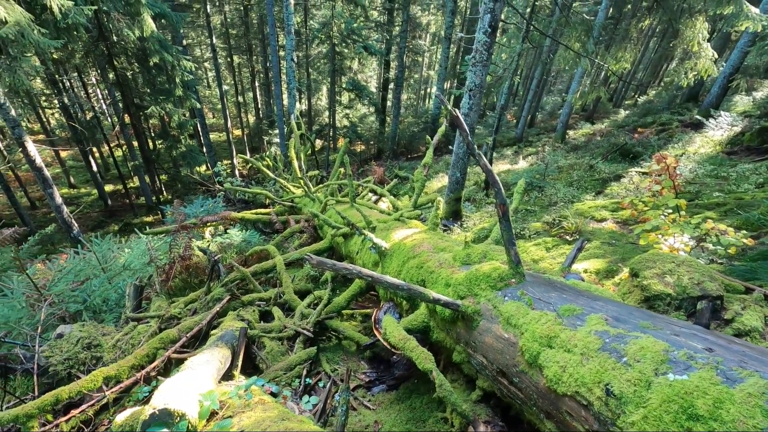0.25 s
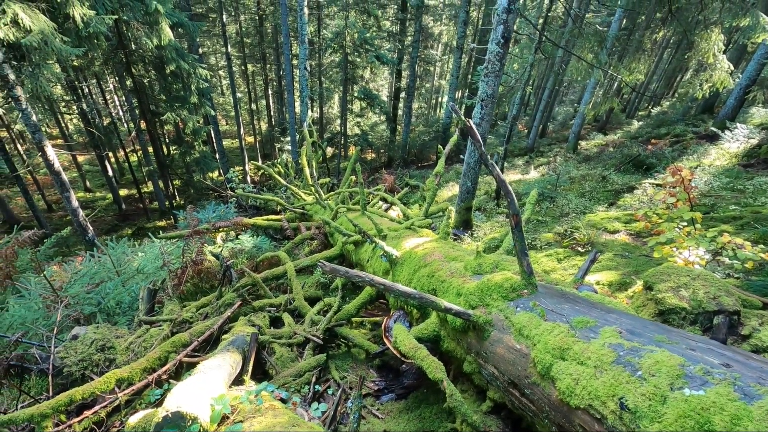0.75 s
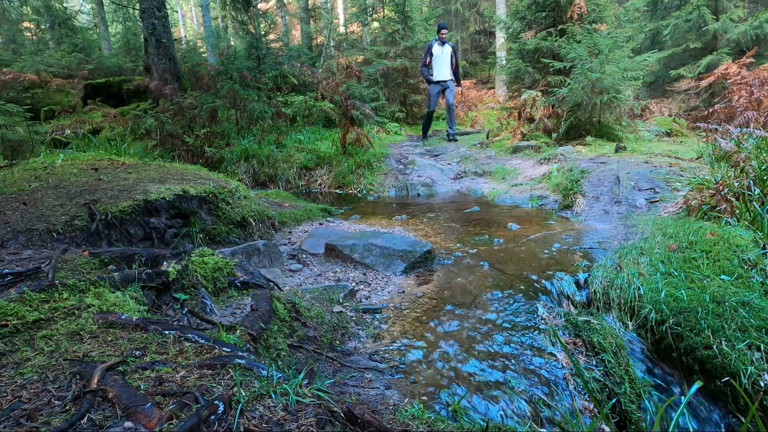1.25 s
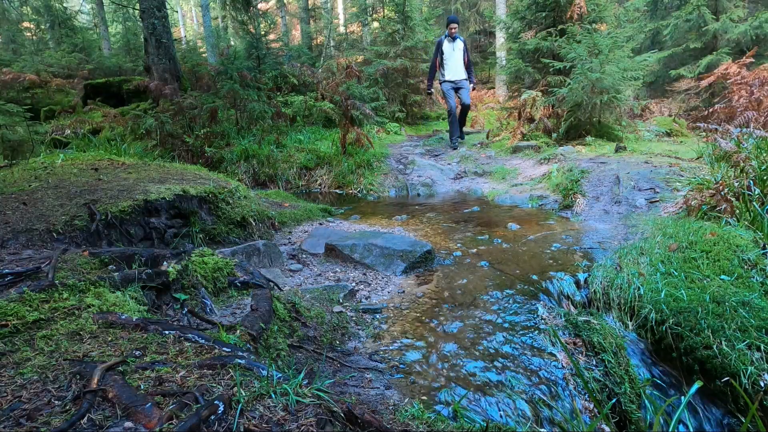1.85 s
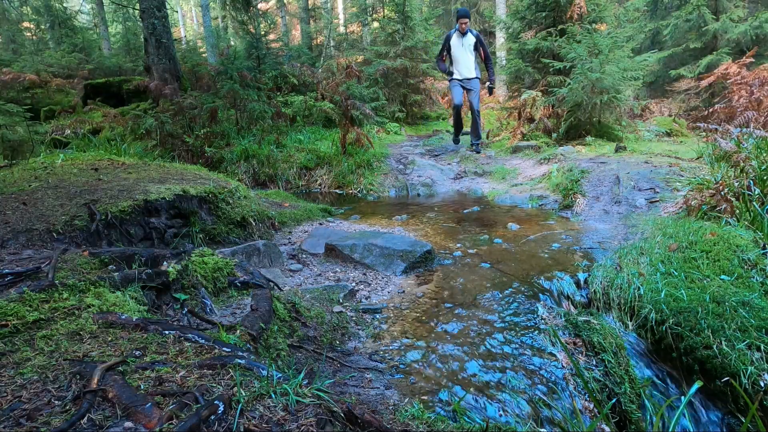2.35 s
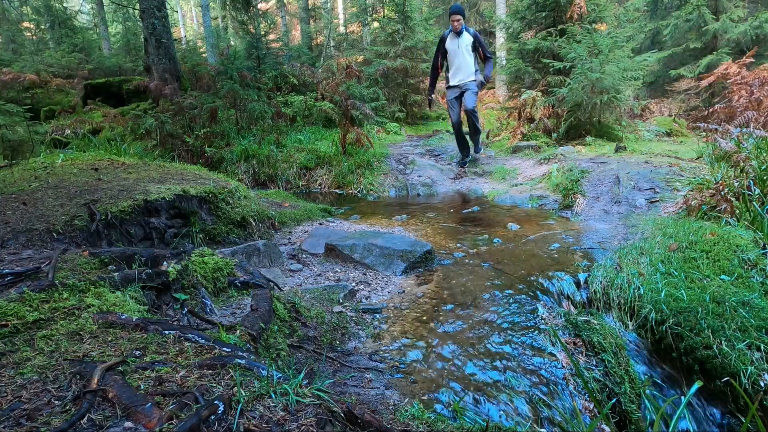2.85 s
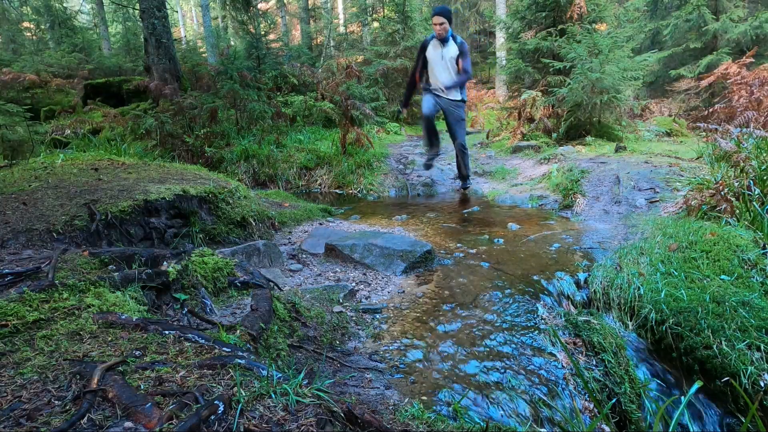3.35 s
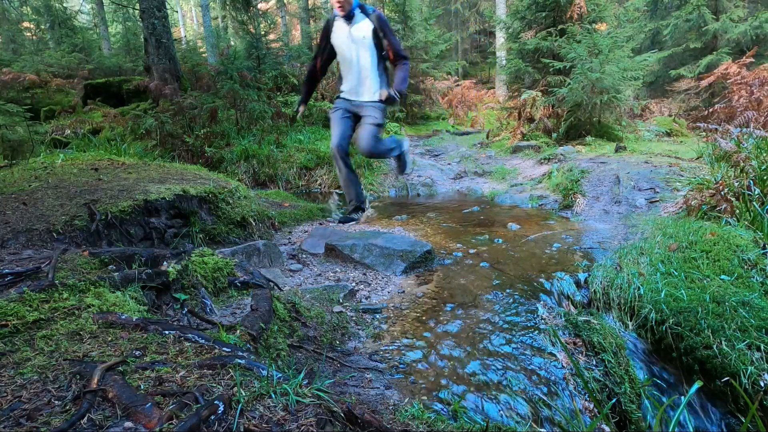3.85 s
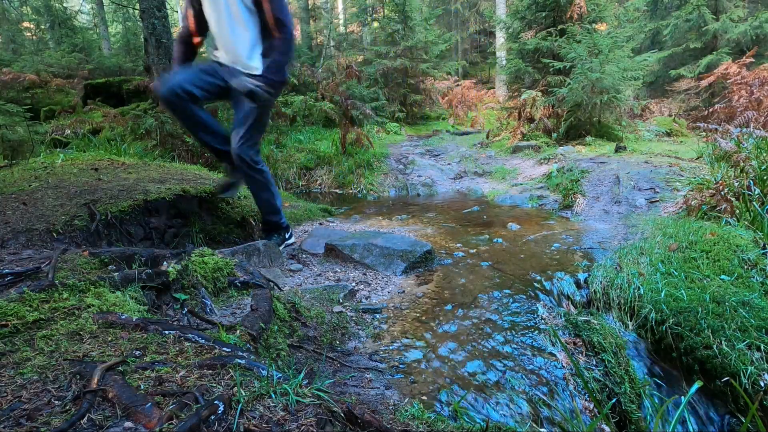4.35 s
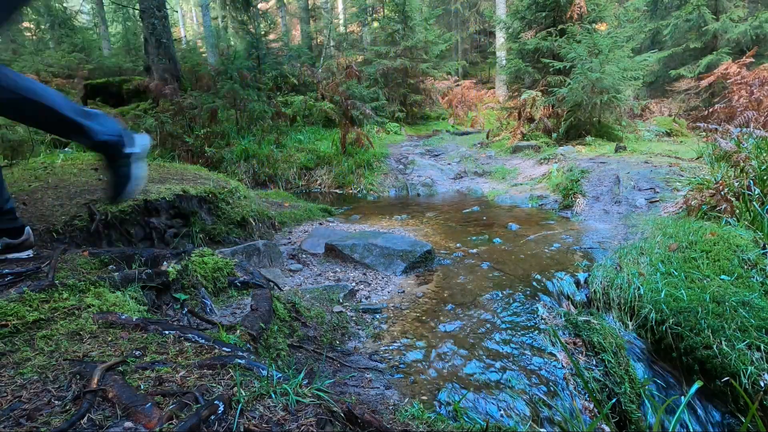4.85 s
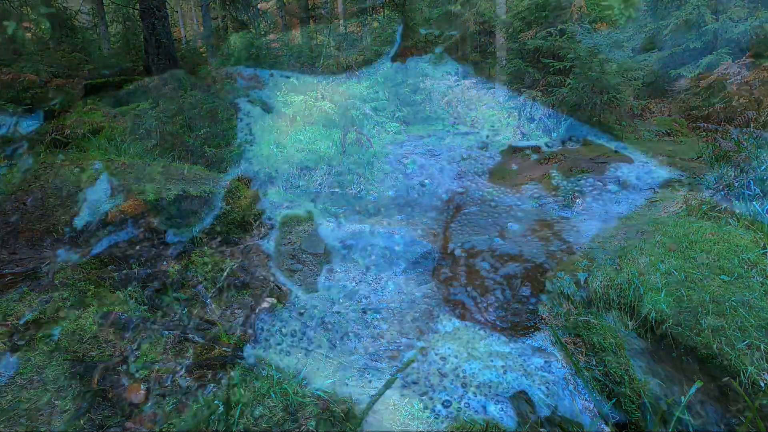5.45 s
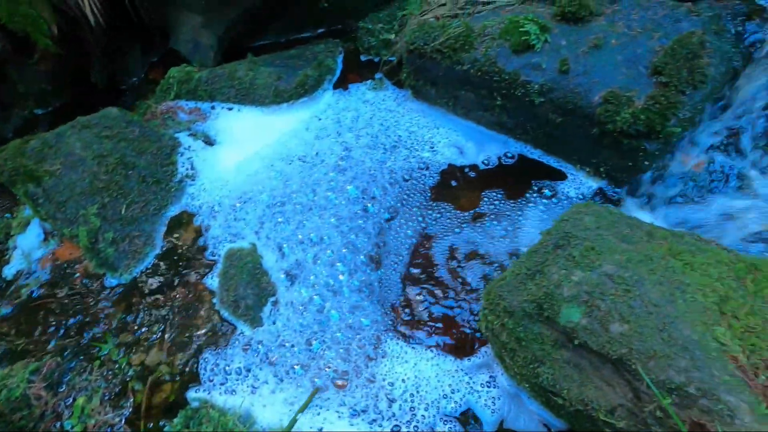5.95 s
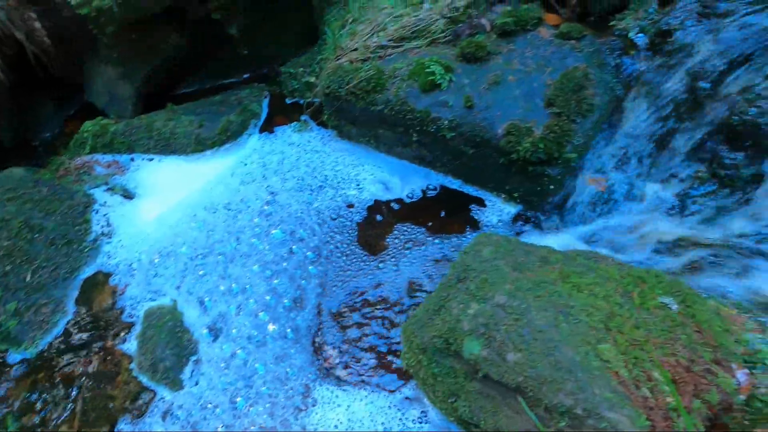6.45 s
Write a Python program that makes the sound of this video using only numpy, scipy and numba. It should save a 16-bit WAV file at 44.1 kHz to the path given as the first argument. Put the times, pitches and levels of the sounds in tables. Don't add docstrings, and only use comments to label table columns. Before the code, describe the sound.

Outdoors in a quiet forest: a very faint airy hush, then a sudden cut to a small stream gurgling steadily, slightly to the right. Two barely audible steps precede a sharp crunching footfall on gravel, a duller step, and a low soft thud on mossy ground, a little left. Finally a close cascade of fizzing, bubbling water takes over, centred and stronger.

```python
import sys
import numpy as np
from scipy import signal
from scipy.fft import rfft, irfft, next_fast_len
from scipy.io import wavfile
from scipy.ndimage import uniform_filter1d, map_coordinates
from numba import njit

SR = 44100
rng = np.random.default_rng(int(sys.argv[2]) if len(sys.argv) > 2 else 0)


def wav_out(sig):
    wavfile.write(sys.argv[1], SR, np.round(np.clip(np.atleast_2d(sig).T, -1, 1) * 32767).astype(np.int16))


def invert_db(x):
    u = np.asarray(x, float) / 20
    return 10 ** u


N = 295470
CUT, FADE = (1.0175, 1.0215), (5.275, 5.58)


def unit(x):
    return x / np.sqrt(np.mean(x ** 2) + 1e-20)


def along(points, hz):
    f, v = np.transpose(points)
    return np.interp(np.log(hz + 1), np.log(f + 1), v)


def ramp(span):
    return np.interp(np.arange(N) / SR, span, [0, 1])


def wobble(rate):
    knots = rng.standard_normal(int(N * 40 / SR) + 4)
    return map_coordinates(knots, [np.arange(N) * rate / SR])


def filtered(x, response):
    m = next_fast_len(N + 8192)
    return irfft(rfft(x, m) * response(np.fft.rfftfreq(m, 1 / SR)), m)[..., :N]


def white(x):
    hz, power = signal.welch(x, SR, nperseg=512)
    power = uniform_filter1d(power, size=5)
    return unit(filtered(x, lambda f: np.interp(f, hz, power) ** -.5))


def patchy(patchy_db):
    z = signal.stft(rng.standard_normal(N), nperseg=512)[2]
    field = uniform_filter1d(rng.standard_normal(z.shape), 6, 0)
    field = uniform_filter1d(field, 8, 1)
    return unit(signal.istft(z * invert_db(patchy_db * unit(field)), nperseg=512)[1][:N])


def stereo(common, own, alike):
    def turn(hz):
        return np.arccos(np.clip(along(alike, hz), -1, 1)) / 2

    mid = filtered(common, lambda hz: np.cos(turn(hz)))
    side = filtered(own, lambda hz: np.sin(turn(hz)))
    return np.array([mid + side, mid - side])


@njit
def add(out, start, step, size, cycles, rise):
    for k in range(len(start)):
        life = cycles[k] / step[k]
        first = int(start[k])
        for i in range(min(int(2.5 * life), len(out) - first - 1)):
            u = (i + 1 - (start[k] - first)) / life
            swing = np.sin(2 * np.pi * cycles[k] * u * (1 + rise * u / 2))
            out[first + i + 1] += size[k] * 8 * u * np.exp(-3 * u) * swing


def air(level_db):
    # (frequency [Hz], level [dB per Hz])
    lump_colour = [(10, -20), (22, 3), (45, -3), (70, 0), (95, -12), (130, -38), (250, -120)]
    pair = stereo(*rng.standard_normal((2, N)), [(20, 0.85), (120, 0.87)])
    lumps = invert_db(3 * wobble(9)) * filtered(pair, lambda hz: invert_db(along(lump_colour, hz)))
    return invert_db(level_db) * unit(lumps)


def clearing():
    # (frequency [Hz], level [dB per Hz])
    hush_colour = [(79, -37), (135, -6), (189, 0.5), (270, -8.5), (481, -8.5), (648, -13), (730, -10.5),
                   (806, -16), (1020, -11.5), (1650, -12), (4020, -27), (5640, -27.5), (7450, -39),
                   (15500, -47)]
    # (frequency [Hz], likeness [0-1])
    hush_alike = [(60, 0.8), (130, 0.94), (290, 0.89), (640, 0.93), (1410, 0.9), (3100, 0.67), (6820, 0.62),
                  (15000, 0.05)]
    hush_db = -71.5 + 1 * np.arange(N) / SR
    hush = stereo(patchy(1.4), patchy(1.5), hush_alike)
    hush = filtered(hush, lambda hz: invert_db(along(hush_colour, hz)))
    return (invert_db(hush_db) * unit(hush) + air(-75)) * (1 - ramp((1.012, 1.016)))


def footfalls():
    # (time [s], slap level [dB], slap pitch [Hz], slap life [cycles], gravel level [dB])
    soles = [(2.814, -46, 105, 2.4, -40), (3.2435, -43, 120, 2.2, -43), (3.8719, -16.5, 1020, 1.4, -17.5),
             (3.874, -26, 352, 2.1, -24), (3.881, -36, 130, 2.6, -19), (3.8994, -20.5, 179, 2.5, -12),
             (3.9009, -20, 500, 0.79, -16), (3.9073, -27, 680, 3.8, -13), (3.9183, -22.5, 187, 0.98, -18),
             (4.268, -32.5, 122, 2, -35), (4.2857, -29, 264, 1.3, -23), (4.303, -38, 132, 1.5, -40),
             (4.7182, -34, 332, 2.1, -38), (4.7225, -21, 200, 1.8, -24), (4.73, -25.5, 139, 1.2, -23),
             (5.3065, -42, 75, 4.3, -53), (5.338, -29.5, 290, 1.4, -21)]
    gravel_t60_s = 0.044
    out, t = np.zeros(N + SR), np.arange(SR // 2) / SR
    s, slap_db, slap_hz, cycles = np.transpose(soles)[:4]
    add(out, s * SR, slap_hz / SR, -invert_db(slap_db), cycles, -.12)
    grit = signal.butter(3, [260, 5200], "bandpass", fs=SR, output="sos")
    for s, *_, gravel_db in soles:
        grains = np.repeat(rng.uniform(-1.7, 1.7, len(t)), 24)[:len(t)]
        stones = signal.sosfilt(grit, rng.standard_normal(len(t)) * invert_db(5 * grains))
        crunch = unit(signal.lfilter([1], [1, -.7], stones))
        out[round(s * SR):][:len(t)] += crunch * invert_db(gravel_db - 10.5 - 60 * t / gravel_t60_s)
    return out[:N]


def peat():
    # (time [s], level [dB], frequency [Hz], decay time t60 [s])
    swings = [(.039, -53, 57, 0.28), (.057, -54, 57, .15), (.416, -50, 42, .15), (.545, -54, 30, .1),
              (.632, -53, 55, 0.13), (.775, -52, 30, .1), (.95, -55, 35, 0.11), (2.845, -55, 45, .15),
              (3.272, -48, 33, .35), (3.885, -43, 56, .22), (3.937, -25, 46, 0.13), (4.288, -25, 38, .08),
              (4.313, -35.5, 46, .2), (4.725, -34, 43, .2), (4.748, -15, 44.7, .15), (4.8, -45, 35, .3),
              (5.355, -42, 48, .17), (5.46, -36, 70, 0.099)]
    rise_s = 0.013
    out, t = np.zeros(N + SR), np.arange(SR // 2) / SR
    for s, db, hz, t60 in swings:
        envelope = invert_db(db - 60 * t / t60) * (1 - np.exp(-t / rise_s))
        out[round(s * SR):][:len(t)] -= envelope * np.sin(2 * np.pi * hz * t)
    return out[:N]


def plops(bubbles):
    s, db, hz = np.transpose(bubbles)
    cycles = 5.17 * (hz / 1000) ** 0.095
    out = np.zeros(N)
    add(out, s * SR, hz / SR, invert_db(db), np.maximum(cycles, 1), .1)
    return out


def swarm(count, cycles, spread_db, low_hz, top_hz, clump_db):
    when, pitch, life, size = rng.random((count, 4)).T
    hz = low_hz * (top_hz / low_hz) ** np.sqrt(pitch)
    clumps_db = clump_db * wobble(20)[(when * N).astype(int)]
    loud = invert_db(-spread_db * np.log(1.01 - size) + clumps_db)
    out = np.zeros(N)
    add(out, when * N, hz / SR, loud, cycles * (0.35 + life), .2)
    return out


def splashes(count, t60, spread_db):
    when, size = rng.random((count, 2)).T
    kicks = np.bincount((when * N).astype(int), invert_db(-spread_db * np.log(1.03 - size)), N)
    return signal.lfilter([1], [1, -invert_db(-60 / (t60 * SR))], kicks)


def water(colour, alike, gurgle_db, fizz_db, bursts, bubble_db, spray_db, patchy_db):
    near = white(swarm(count=30000, cycles=4.3, spread_db=3.5, low_hz=200, top_hz=14950, clump_db=0.7))
    large = swarm(count=3600, cycles=6.5, spread_db=2.5, low_hz=616.0, top_hz=1600, clump_db=1.3)
    near = near + invert_db(-11.0) * unit(large)
    spray = unit(splashes(count=1200, t60=0.075, spread_db=5.0) * rng.standard_normal(N))
    spray = filtered(spray, lambda hz: hz / (hz + 2500))
    common = white(patchy(patchy_db) + invert_db(bubble_db) * near + invert_db(spray_db) * spray)
    own = white(patchy(patchy_db) + invert_db(spray_db + 3) * np.abs(spray) * rng.standard_normal(N))
    rush = filtered(stereo(common, own, alike), lambda hz: invert_db(along(colour, hz)))
    fizz = filtered(rush, lambda hz: 1 / (1 + (4000 / (hz + 1)) ** 4))
    gurgle = unit(rush - fizz)
    fizz = unit(fizz)
    burst = filtered(bursts * fizz, lambda hz: 1 / (1 + (hz / 7500) ** 2))
    return invert_db(gurgle_db) * gurgle + invert_db(fizz_db) * (fizz + burst)


def brook():
    # (frequency [Hz], level [dB per Hz])
    ford_colour = [(53, -56), (90, -32), (148, -7), (187, 1), (248, -5.5), (365, -3), (473, -4), (922, -1),
                   (1250, 0), (1720, -3.5), (3590, -8), (6550, -16), (8310, -29.5), (12200, -38),
                   (15500, -47)]
    # (frequency [Hz], likeness [0-1])
    ford_alike = [(100, .99), (1000, .97), (2500, .94), (5000, .85), (7000, .5), (14000, .6)]
    # (frequency [Hz], left over right [dB])
    ford_pan = [(60, 0.0), (110, 1), (200, 0.0), (380, -1.0), (700, -2.0), (1290, -3), (2380, -2.5),
                (4400, -2), (8120, -3.5), (15000, -5.5)]
    # (frequency [Hz], lead of the left [rad])
    ford_lead = [(100, 0.043), (700, -.3), (1640, -0.74), (3000, -1.12), (5500, -1.52), (6300, -0.72),
                 (8000, 0.82), (15000, -0.66)]
    # (time [s], level over the fizz [dB])
    sprays = [(1.68, -4), (1.86, 15), (2.47, 7), (2.55, 5), (2.61, 7), (3.01, 6), (3.345, 9), (3.635, 7),
              (3.74, 2), (3.97, 6), (4.162, 9), (4.622, 6), (4.736, 11), (4.888, 5)]
    # (time [s], peak level [dB],
    # pitch [Hz])
    brook_plops = [(1.104, -28, 850), (1.2586, -31, 547), (1.33, -30.5, 681), (1.765, -33, 675),
                   (1.8014, -29.5, 547), (1.998, -29, 1110), (2.1297, -24.5, 1270), (2.1431, -25.5, 700),
                   (2.2025, -29, 570), (2.2182, -26.5, 1130), (2.2793, -28.5, 726), (2.4675, -26, 2220),
                   (2.4699, -29, 1330), (2.7452, -30, 560), (2.7752, -21.5, 1203), (2.9272, -25, 950),
                   (3.1064, -27, 810), (3.1168, -24, 910), (3.1737, -26, 905), (3.4312, -30, 650),
                   (3.5646, -26, 1600), (3.6875, -29, 930), (4.0633, -26, 835), (4.1326, -27.5, 1900),
                   (4.163, -20, 850), (4.232, -28, 890), (4.2802, -32, 277), (4.3349, -22, 1600),
                   (4.4145, -27, 1310), (5.1049, -33.5, 800),
                   (1.0509, -25, 2650), (1.0679, -28, 3200), (1.1475, -27, 3140), (1.2537, -30, 4480),
             (1.2775, -30, 3180), (1.3287, -35, 7750), (1.6678, -27, 5150), (1.6778, -29, 5030),
             (1.7152, -25, 3160), (1.7456, -27, 4500), (1.7634, -26, 3200), (1.861, -22, 5000),
             (2.467, -34, 5350), (2.4809, -30, 4530), (2.76, -23.5, 5380), (2.866, -24.5, 4260),
             (2.9088, -24, 3240), (2.9374, -26, 3810), (3.0135, -19.5, 4070), (3.3476, -31, 2690),
             (3.6294, -26, 5230), (3.7331, -21.5, 4750), (3.8026, -27.5, 2680), (4.165, -19.5, 3500),
             (4.2013, -26, 3100), (4.2877, -31, 3810), (4.8225, -30, 3800), (5.0112, -31, 4530),
             (5.2325, -26.5, 3120)]
    spray_rise_s, spray_fall_s = .01, 0.013
    t = np.arange(N) / SR
    sprays_db = sum(db * np.exp(np.minimum((t - s) / spray_rise_s, (s - t) / spray_fall_s)) for s, db in sprays)
    gurgle_db = -37.5 + 0.58 * wobble(6.02)
    fizz_db = -47.5 - 8 * np.exp(-np.abs(t - CUT[0]) / 0.13)
    rush = water(ford_colour, ford_alike, gurgle_db, fizz_db, invert_db(sprays_db) - 1,
                 bubble_db=2.0, spray_db=4.5, patchy_db=1.0)
    rush = rush + invert_db(-2.0) * plops(brook_plops)

    def half(hz):
        return invert_db(along(ford_pan, hz) / 2) * np.exp(.5j * along(ford_lead, hz))

    return filtered(rush, lambda hz: np.array([half(hz), 1 / half(hz)])) + air(-77.5)


def cascade():
    # (frequency [Hz], level [dB per Hz])
    fall_colour = [(53, -58), (90, -36), (172, -4), (335, -14), (527, -1.5), (613, -5), (760, -1.5),
                   (963, -3), (1650, -4.5), (1960, -9), (3740, -10.5), (6010, -18.5), (11000, -36.5),
                   (12500, -37), (15500, -46)]
    # (frequency [Hz], likeness [0-1])
    fall_alike = [(100, 0.99), (1500, 1), (4000, .99), (7000, 0.94), (10000, 0.25), (15000, 0.6)]
    # (frequency [Hz], left over right [dB])
    fall_pan = [(10500, 0), (12500, -4.5), (15500, -6)]
    # (time [s], level [dB])
    flow = [
        (5.62, -1.5),
        (5.73, 0),
        (5.99, -1),
        (6.1, .3),
        (6.2, 0.2),
        (6.36, 0),
        (6.56, 0),
        (6.66, 0.5),
        (6.7, 1),
    ]
    t = np.arange(N) / SR
    flow_db = np.interp(t, *np.transpose(flow))
    fizz_db = -44 + 1.3 * flow_db + 3 * (t - FADE[1])
    rush = water(fall_colour, fall_alike, -31.5 + flow_db, fizz_db, 0,
                 bubble_db=-1.0, spray_db=0.5, patchy_db=0.5)
    return filtered(rush, lambda hz: invert_db(np.outer([.5, -.5], along(fall_pan, hz)))) + air(-66.5)


def scene():
    # (time [s], peak level [dB], pitch [Hz])
    cascade_plops = [(5.5379, -18, 1230), (5.6796, -19, 770), (5.6993, -18, 1110), (5.7145, -23, 1357),
                     (5.7507, -20, 1600), (5.7865, -18, 3860), (5.7875, -16, 1490), (5.8113, -29, 4600),
                     (5.8302, -20, 3700), (5.8474, -28.5, 7700), (5.8727, -23, 650), (5.945, -25, 5530),
                     (5.952, -21.5, 726), (6.0322, -24, 1840), (6.0338, -18, 800), (6.0532, -21, 1900),
                     (6.077, -23, 1790), (6.0965, -13, 750), (6.1274, -20, 3050), (6.1834, -17, 3660),
                     (6.203, -24, 2260), (6.2045, -26, 4530), (6.303, -20, 3260), (6.4009, -25, 765),
                     (6.4508, -16.5, 730), (6.4605, -18.5, 1150), (6.5476, -21, 3770), (6.6476, -25, 1600),
                     (6.6479, -18.5, 690), (6.6568, -29, 294)]
    fade = ramp(FADE)
    ford = ramp(CUT) * (1 - fade) * brook()
    steps = (footfalls() + peat()) * invert_db([[.4], [-.4]])
    return clearing() + ford + steps + fade * cascade() + invert_db(-5.0) * plops(cascade_plops)


def starved(x, spans):
    hz, t, z = signal.stft(x, SR, nperseg=2048)
    dice = rng.standard_normal((33, len(t))) + .9 * rng.standard_normal(len(t))
    rank = uniform_filter1d(dice, size=2, axis=1).argsort(axis=1).argsort(axis=1) / len(t)
    lost = sum(np.outer(along(share, hz), (t >= t0) & (t < t1)) for t0, t1, share in spans)
    band = (hz / 689).astype(int)
    return signal.istft(z * (rank[band] >= lost), SR, nperseg=2048)[1][:N]


def band_limit(x):
    return signal.sosfilt(signal.butter(12, 15670, fs=SR, output="sos"), x)


def record(dry):
    # (from [s], to [s], [(frequency [Hz], share lost [0-1])])
    mid_lost = [
        (5.55, 7, [(7000, 0), (8000, .05), (10000, .1), (10800, .5), (11500, .06), (12500, 0)]),
    ]
    side_lost = [
        (0, 5.62, [(5200, 0), (6200, .15), (7300, .15), (7900, .88), (10500, .85), (12500, .4), (15500, .5)]),
        (5.62, 6.14, [(7500, 1), (9800, .85), (11000, .2), (12000, .4), (13000, .05)]),
        (6.14, 7, [(600, 0), (900, 1), (3000, .6), (5500, .1), (7500, .9), (9500, .35), (11000, .2), (12000, .5), (13000, .08)]),
    ]
    mid = starved((dry[0] + dry[1]) / 2, mid_lost)
    side = starved((dry[0] - dry[1]) / 2, side_lost)
    return band_limit(np.array([mid + side, mid - side]))


dry = scene()
out = record(dry)
wav_out(out)
```